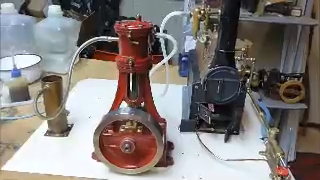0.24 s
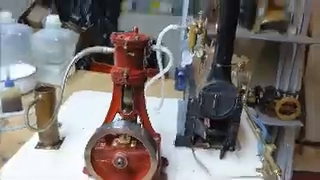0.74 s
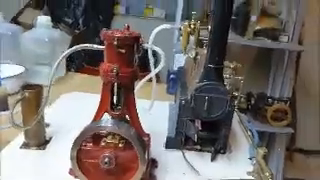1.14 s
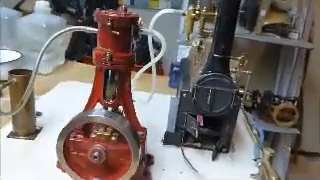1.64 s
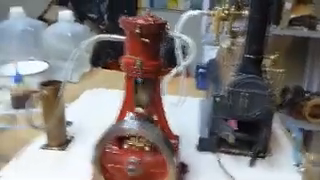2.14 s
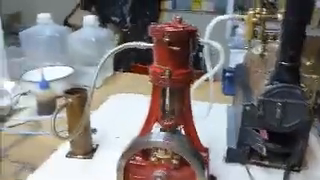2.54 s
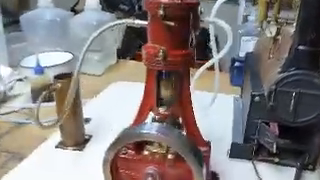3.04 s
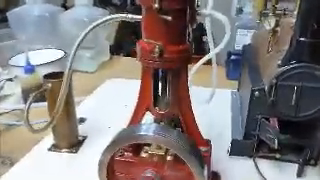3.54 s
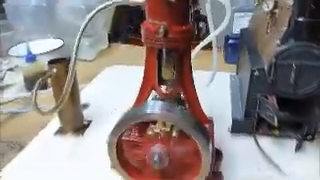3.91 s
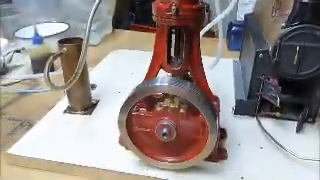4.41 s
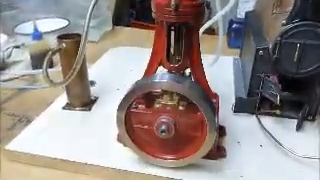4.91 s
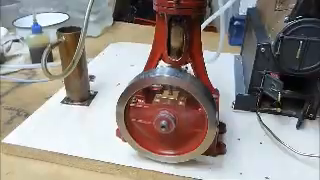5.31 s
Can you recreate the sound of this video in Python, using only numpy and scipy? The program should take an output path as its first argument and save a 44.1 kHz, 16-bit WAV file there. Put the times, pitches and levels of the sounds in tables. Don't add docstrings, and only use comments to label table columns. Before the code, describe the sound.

Close stereo sound of a model steam engine: steady airy exhaust tone around 940 Hz, bright sputtering hiss and low board rumble, all pulsing with the crank. Sharp knocks ring the iron frame and thump the board, with softer double taps mid-turn. Occasional tiny water spits, loose ticks and faint squeaks. Little room echo. The microphone nears, the whistle fades, then the engine accelerates.

```python
import sys
import numpy as np
from scipy import signal
from scipy.fft import rfft, irfft, next_fast_len
from scipy.io import wavfile
from scipy.ndimage import uniform_filter1d, map_coordinates

SR = 44100
rng = np.random.default_rng(int(sys.argv[2]) if len(sys.argv) > 2 else 0)


def dump_mix(stems):
    frames = np.atleast_2d(stems).T
    limited = np.clip(frames, -1, 1)
    pcm = np.round(limited * 32767).astype(np.int16)
    wavfile.write(sys.argv[1], SR, pcm)


def undo_db(level):
    steps = np.asarray(level, float) / 20
    return 10 ** steps


N = 245195

# t/s, board level/dB, frame ring level/dB, crack level/dB
KNOCKS = [(0.232, -18.5, -19.5, -16.5), (0.5196, -18, -23, -21), (0.8076, -18, -19, -15.5),
          (1.0935, -17.5, -21, -17.5), (1.384, -20, -20.5, -14), (1.673, -17.5, -34, -15),
          (1.9638, -17, -24, -23), (2.2564, -16, -25.5, -25), (2.5501, -18.5, -21, -31.5),
          (2.8456, -16, -25, -19.5), (3.1405, -18, -21, -27), (3.431, -16, -24, -21),
          (3.7273, -16.5, -20, -32), (4.0254, -18.5, -21, -19.5), (4.321, -17.5, -20, -20.5),
          (4.6046, -14, -20.5, -19), (4.8714, -15, -21, -20.5), (5.1185, -16, -21, -20),
          (5.3539, -14, -21.5, -25)]
# t/s, peak level/dB, ping f/Hz, ping level/dB
TICKS = [(0.3696, -38, 2600, -45), (0.754, -31, 2670, -22), (0.7744, -25, 2900, -19),
         (2.395, -26, 2610, -38), (3.28, -23, 2750, -27), (4.3685, -13.5, 3570, -37),
         (4.733, -15.5, 2460, -14.5)]
# start t/s, end t/s
NEARING = (0.82, 3.3)


def unit(x):
    return x / np.sqrt(np.mean(x ** 2) + 1e-20)


def along(points, hz):
    f, v = np.transpose(points)
    return np.interp(np.log(hz + 1), np.log(f + 1), v)


def wobble(rate):
    knots = rng.standard_normal(int(N * rate / SR) + 4)
    return map_coordinates(knots, [np.arange(N) * rate / SR])


def filtered(x, response):
    m = next_fast_len(N + SR // 2)
    return irfft(rfft(x, m) * response(np.fft.rfftfreq(m, 1 / SR)), m)[..., :N]


def coloured(x, spectrum):
    return filtered(x, lambda hz: undo_db(along(spectrum, hz)))


def high_pass(x):
    low_hz = 161
    return filtered(x, lambda hz: 1 / (1 + (low_hz / (hz + 1)) ** 4.5))


def resonances(modes):
    def response(f):
        total = 0
        for k, (centre, width, db) in enumerate(modes):
            band = 1j * f * width / (centre * centre - f * f + 1j * f * width)
            total = total + (-1) ** k * undo_db(db) * band
        return total
    return response


def pair_noise():
    # f/Hz, correlation/1
    alike = [(60, 0.6), (150, 0.91), (380, 0.98), (950, 0.88), (2380, 0.68), (5980, 0.75), (15000, 0.67)]

    def mid_side(hz):
        turn = np.arccos(np.clip(along(alike, hz), -1, 1)) / 2
        return np.array([np.cos(turn), np.sin(turn)])

    mid, side = filtered(rng.standard_normal((2, N)), mid_side)
    return np.array([mid + side, mid - side])


def patchy(pair, depth_db):
    z = signal.stft(pair, nperseg=512)[2]
    field = uniform_filter1d(rng.standard_normal(z.shape[1:]), 4, 0)
    field = uniform_filter1d(field, 10, 1)
    return signal.istft(z * undo_db(depth_db * unit(field)), nperseg=512)[1][:, :N]


def turn_starts():
    s = np.transpose(KNOCKS)[0]
    return np.r_[2 * s[0] - s[1], s, 2 * s[-1] - s[-2]]


def pressure_and_view(s):
    # t/s, level/dB
    pressure = [(0, 0), (1, -0.15), (2, -0.2), (3, 1), (3.6, 1.5), (4.4, 2), (4.8, 3.5), (5.2, 5.5),
                (5.56, 4.5)]
    times, db = np.transpose(pressure)
    return np.interp(s, times, db), np.interp(s, NEARING, (0, 1))


def room_air():
    # f/Hz, level/dB per Hz
    air_spectrum = [(25, -42), (50, -31), (80, -12.5), (130, -9), (200, 1), (500, 0), (1300, -20.5),
                    (9900, -15), (15600, -52)]
    return undo_db(-43.0) * unit(coloured(pair_noise(), air_spectrum))


def flow_levels(t):
    valve = {"eases": (0.071, 0.088, 0.098), "shuts": (0.457, 0.11, 0.015), "opens": (.485, 0.013, 0.027),
             "admits": (0.574, 0.042, 0.044), "exhausts": (0.707, 0.079, 0.11),
             "cushions": (0.94, 0.023, 0.019), "reverses": (0.95, 0.031, 0.018)}
    # pot level/dB, chuff level/dB, leak level/dB, shake level/dB
    valve_gain = [(-3, 0.5, -1, 6), (-14.5, -5, -5, -6), (1.2, 2.5, 2, 7.8), (-1.5, 2.9, -1, 8),
                  (1.5, 3, 4, 1.5), (-3, 5.5, -3.5, 5), (-7, 0.5, 3, -6)]
    layers = {"pot": (-37, 0.97, -3), "chuff": (-40, 1.25, 0.16), "leak": (-40.5, 0.96, .3),
              "shake": (-41.5, 0.56, 0.96)}
    edge = 2.36
    s = turn_starts()
    share = np.interp(t, s, np.arange(len(s))) % 1
    push_db, near = pressure_and_view(t)
    swing = np.zeros((4, N))
    for (at, rise, fall), db in zip(valve.values(), valve_gain):
        past = (share - at + .5) % 1 - .5
        reach = np.where(past < 0, rise, fall)
        swing += np.outer(db, np.exp(-np.abs(past / reach) ** edge))
    swing[3] += -3.5 + 13 * np.exp(-share / .13)
    return swing + [db + slope * push_db + close_db * near for db, slope, close_db in layers.values()]


def pot_note(t):
    # f/Hz, width/Hz, level far/dB, level near/dB
    pot_modes = [(939.6, 127, 1, 5.5), (1017, 123, -10, 2), (2670, 990, -16.5, -12.5),
                 (2953, 162, -9.5, -1)]
    near, exhaust = np.interp(t, NEARING, (0, 1)), pair_noise()

    def heard(modes):
        return unit(filtered(exhaust, lambda f: sum(resonances([(hz, w, db / 2)])(f) ** 2
                                                    for hz, w, db in modes)))

    far_note = heard([(hz, w, db) for hz, w, db, _ in pot_modes])
    near_note = heard([(hz, w, db) for hz, w, _, db in pot_modes])
    return (1 - near) * far_note + near * near_note


def whistle(t):
    hz = 940 + 17 * wobble(22)
    fade = np.interp(t, (2.4, 3.2), (1, .25))
    return fade * unit(undo_db(1.0 * wobble(35)) * np.sin(2 * np.pi * np.cumsum(hz) / SR))


def exhaust_rush():
    # f/Hz, level/dB per Hz
    rush = [(300, -66), (600, 0.5), (1150, -1.5), (1640, -5), (2600, -1.5), (3500, -7.5), (5000, -4.5),
            (7000, -9), (8000, -23), (11000, -35)]
    return unit(coloured(patchy(pair_noise(), depth_db=2.0), rush))


def gland_leak():
    # f/Hz, level/dB per Hz
    jet = [(2500, -17.5), (4500, -7), (7000, -6.5), (7700, -9), (9800, -5), (12000, -2.5), (14900, -2),
           (15600, -11.5)]
    # f/Hz, width/Hz, level/dB
    whistles = [(5120, 120, 6), (7150, 135, 8.5), (8310, 210, 8.5), (9950, 550, 5.5), (12160, 350, -4)]
    spit = undo_db(0.5 * wobble(400) + 1.35 * wobble(30))
    cavities = resonances(whistles)
    hiss = patchy(pair_noise() * spit, depth_db=1.83)
    return unit(filtered(hiss, lambda hz: undo_db(along(jet, hz)) * (1 + np.abs(cavities(hz)))))


def board_shake():
    # f/Hz, width/Hz, level/dB
    rumble = [(211, 30, -20), (239, 10, -4.5), (296, 60.4, 5.5), (343, 78, 4.5), (375, 55, -13.5),
              (450.5, 33, -1), (486.6, 19, 2), (555, 38, -9), (722, 18, -6.5), (800, 47, -10)]
    return unit(filtered(pair_noise(), resonances(rumble)))


def steam():
    t = np.arange(N) / SR
    pot_db, chuff_db, leak_db, shake_db = flow_levels(t)
    pot = undo_db(1.2 * wobble(25)) * (pot_note(t) + undo_db(-1.5) * whistle(t))
    flow = undo_db(pot_db) * pot
    flow = flow + undo_db(chuff_db + 0.32 * wobble(16)) * exhaust_rush()
    flow = flow + undo_db(leak_db + 0.24 * wobble(9.1)) * gland_leak()
    return flow + high_pass(undo_db(shake_db - 2.7 * wobble(14)) * board_shake())


def free_modes(hz, t60, rise_cycles):
    t, hz, t60 = np.arange(SR // 4) / SR, np.c_[hz], np.c_[t60]
    return undo_db(-60 * t / t60) * (1 - np.exp(-t * hz / rise_cycles)) * np.sin(2 * np.pi * hz * t)


def ring(modes, db, sign, scatter_db):
    y = (sign * undo_db(db + rng.normal(0, scatter_db, len(db)))) @ modes
    return y / np.abs(y).max()


def blows():
    # share of turn/1, lag t/s, board level/dB, crack level/dB
    gear_taps = [
        (.537, 0.00033, -29.5, -26.5),
        (.537, .033, -29, -25),
        (.933, 0.00025, -33.5, -36),
    ]
    # board gain close by/dB, crack growth/dB per dB of pressure
    tap_growth = [(4.5, 0.84), (3.5, -1.1), (7, 1.2)]
    slop_s, scatter_db, push = .0012, 0.7, 0.36
    knocks = [(s, wood + 2.3, frame + 5, crack + 4, .008) for s, wood, frame, crack in KNOCKS]
    ticks = [(s, db - 16, db - 27, db - 4.5, .015) for s, db, _, _ in TICKS]
    starts, taps = turn_starts(), []
    for (share, lag, wood, crack), (close_db, bite) in zip(gear_taps, tap_growth):
        chance = rng.standard_normal((len(starts) - 1, 3))
        s = starts[:-1] + share * np.diff(starts) + lag + slop_s * chance[:, 0]
        push_db, near = pressure_and_view(s)
        wood_db = wood + close_db * near + push * push_db + scatter_db * chance[:, 1]
        crack_db = crack + bite * push_db + scatter_db * chance[:, 2]
        taps += [(a, b + 4, c - 6, c - 1, .02) for a, b, c in zip(s, wood_db, crack_db) if a < N / SR]
    return knocks + taps + ticks


def gear():
    # f/Hz, level/dB, t60/s, side of the node/+-1
    board_modes = [(203, -9, .25, -1), (248, -17, .35, 1), (298, -2, .17, -1), (335, -11, .15, 1),
                   (382, -4, .15, 1), (449, 0, .09, -1), (492, -10, .35, -1), (537, -7, .16, 1),
                   (665, -6.5, .11, 1), (792, -15, .12, -1)]
    # f/Hz, level/dB, t60/s, side/+-1
    base_modes = [(506, 0, 0.0099, 0.9), (1040, -12, 0.019, -1.05)]
    # f/Hz, level far/dB, level near/dB, t60/s
    frame_modes = [(1122.5, 1.5, -10, 0.091), (1194, 13.5, -9.5, 0.025), (1348, 1, -3.5, 0.09),
                   (1428, 4, 5, 0.051), (1598, 7.5, -2, 0.018), (1760, -4, -15, 0.12),
                   (2077, -18, -11, 0.1), (2443, -5, -12.5, 0.054), (2795, 8.5, -12, 0.026),
                   (3676, -8, -5, 0.019)]
    # f/Hz, level/dB
    crack_spectrum = [(900, -40), (1500, -8.5), (2100, -7.5), (2700, 0), (3250, -9), (3850, -6.5),
                      (4500, -16), (5400, -17.5), (6800, -22), (9000, -23.5)]
    base_lag_s, board_lag_s = .001, .0017
    out, cracks, t = np.zeros(N + SR), np.zeros(N + SR), np.arange(SR // 4) / SR
    rattle = undo_db(-15.5 - 60 * t / 0.094)
    b_hz, b_db, b_t60, b_side = np.transpose(board_modes)
    d_hz, d_db, d_t60, d_side = np.transpose(base_modes)
    f_hz, far, close, f_t60 = np.transpose(frame_modes)
    f_sign = (-1) ** np.arange(len(far))
    board = free_modes(b_hz, b_t60, rise_cycles=0.035)
    base = free_modes(d_hz, d_t60, rise_cycles=0.38)
    frame = free_modes(f_hz, f_t60, rise_cycles=0.63)
    for s, board_db, ring_db, crack_db, crack_t60 in blows():
        snap = undo_db(-60 * t / crack_t60) * (1 - np.exp(-t / 0.00053))
        near = np.interp(s, NEARING, (0, 1))
        f_db = far + near * (close - far)
        i = round((s - .0001) * SR)
        j, k = i + round(board_lag_s * SR), i + round(base_lag_s * SR)
        out[j:j + len(t)] += undo_db(board_db - 1.18) * ring(board, b_db, b_side, scatter_db=1.4)
        out[k:k + len(t)] += undo_db(board_db - 6.5) * ring(base, d_db, d_side, scatter_db=2.0)
        out[i:i + len(t)] += undo_db(ring_db + 0.12) * ring(frame, f_db, f_sign, scatter_db=2.2)
        cracks[i:i + len(t)] += undo_db(crack_db + 11.5) * (snap + rattle) * rng.standard_normal(len(t))
    for s, _, hz, db in TICKS:
        ping = free_modes([hz], [0.034], rise_cycles=3.2)[0]
        out[round(s * SR):][:len(t)] += undo_db(db - 4.5) * ping
    return high_pass(out[:N] + coloured(cracks[:N], crack_spectrum))


def shop(x):
    # f/Hz, t60/s
    decay = [(200, 0.078), (2000, 0.26), (10000, 0.08)]
    hz, t, z = signal.stft(rng.standard_normal((2, SR // 2)), SR, nperseg=256)
    tail = signal.istft(z * undo_db(-60 * t / along(decay, hz)[:, None]), SR, nperseg=256)[1]
    late = np.pad(x, (400, 0))[None]
    return signal.fftconvolve(late, tail / np.linalg.norm(tail[0]), axes=1)[:, :N]


def spits_and_squeaks():
    # t/s, peak level/dB
    spits = [(.78, -27), (3.2459, -22), (3.2473, -20), (4.388, -28), (4.735, -26)]
    # t/s, length/s, f/Hz, level/dB
    squeaks = [(1.453, .07, 534, -40), (4.094, 0.051, 513, -35), (5.493, 0.031, 990, -30)]
    clicks, tones, t = np.zeros(N), np.zeros(N), np.arange(N) / SR
    for s, db in spits:
        clicks[round(s * SR)] = undo_db(db + 11)
    for s, length, hz, db in squeaks:
        u = np.clip((t - s) / length, 0, 1)
        swell = np.sqrt(np.sin(np.pi * u))
        tones += undo_db(db + 1.5) * swell * np.sin(2 * np.pi * hz * length * (u + 0.036 * u ** 2))
    return tones + filtered(clicks, lambda f: resonances([(12800, 8000, .6)])(f) ** 2)


def scene():
    air_and_steam = room_air() + steam()
    metal = gear() + spits_and_squeaks()
    return air_and_steam + metal + undo_db(-19.0) * shop(metal)


def band_limit(x):
    return signal.sosfilt(signal.butter(12, 15820, fs=SR, output="sos"), x)


def record(dry):
    # f/Hz, level/dB
    tilt = [(60, 0.5), (180, -0.5), (550, 0), (1650, 1), (4970, 1.5), (15000, 0.5)]
    mix = filtered(dry, lambda hz: undo_db(np.outer([.5, -.5], along(tilt, hz))) * (hz < 15630))
    return band_limit(mix)


dry = scene()
out = record(dry)
dump_mix(out)
```